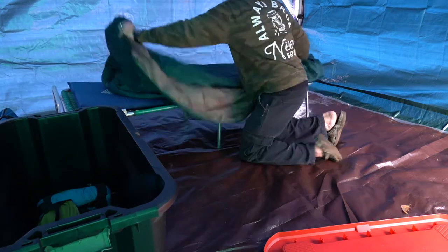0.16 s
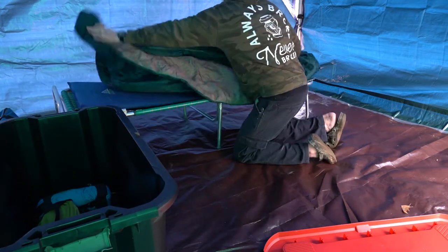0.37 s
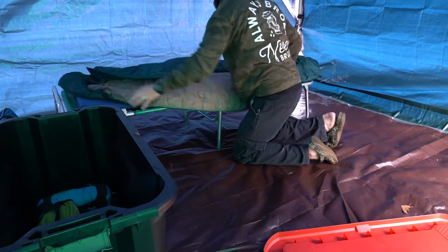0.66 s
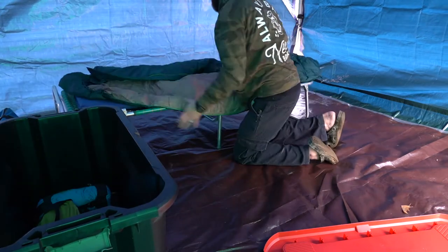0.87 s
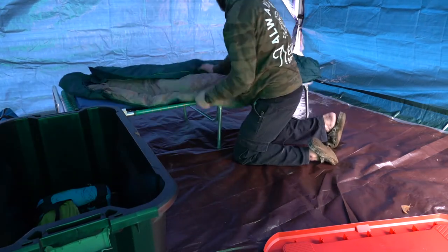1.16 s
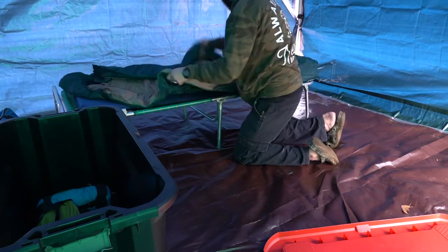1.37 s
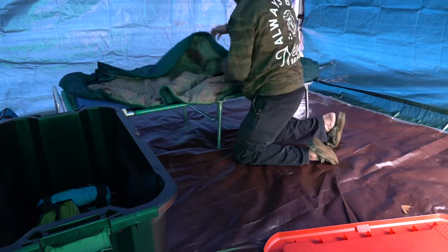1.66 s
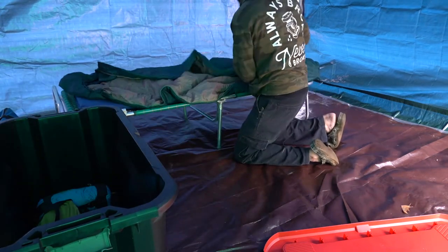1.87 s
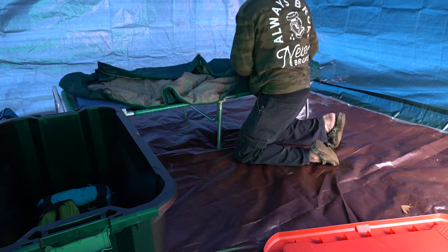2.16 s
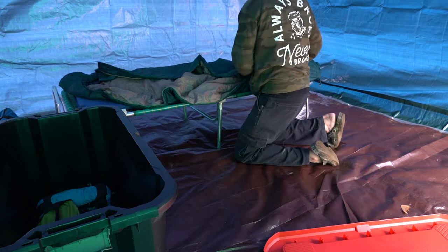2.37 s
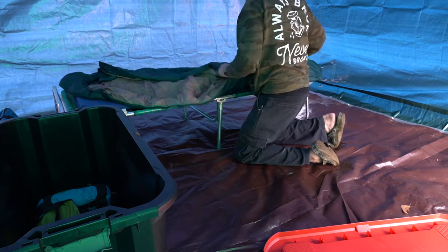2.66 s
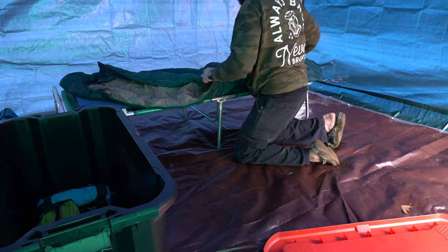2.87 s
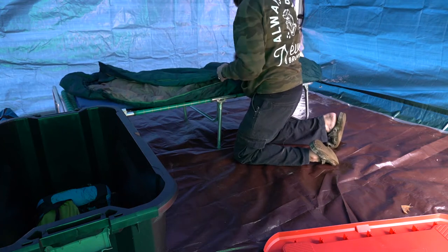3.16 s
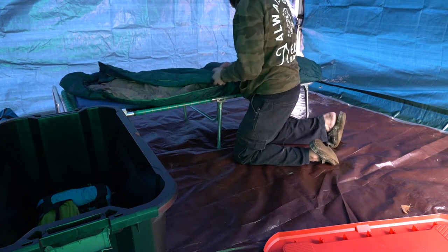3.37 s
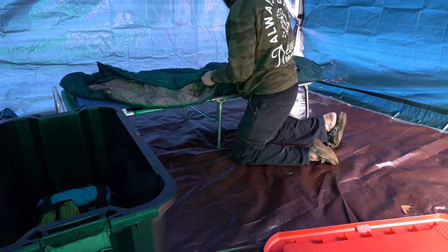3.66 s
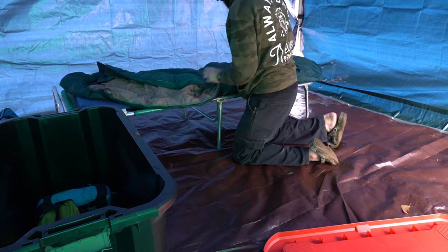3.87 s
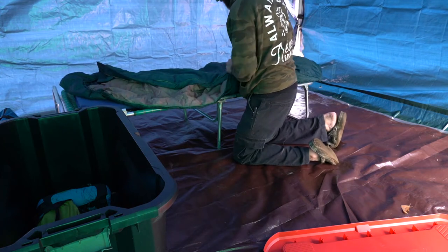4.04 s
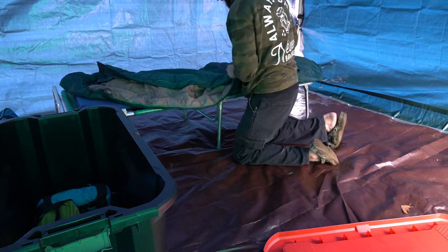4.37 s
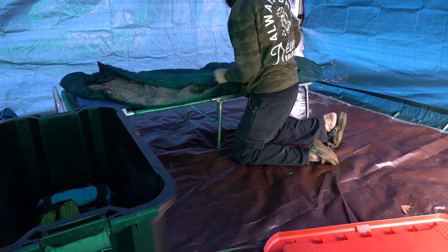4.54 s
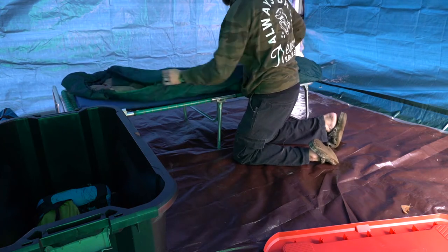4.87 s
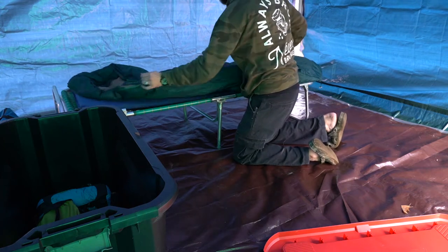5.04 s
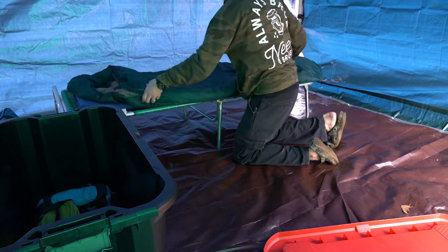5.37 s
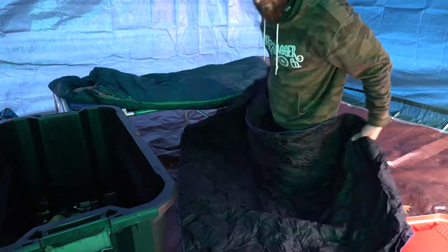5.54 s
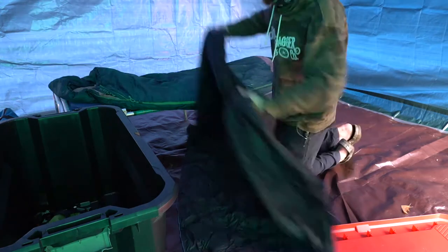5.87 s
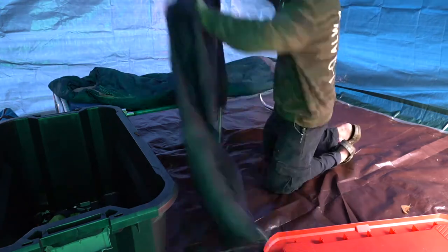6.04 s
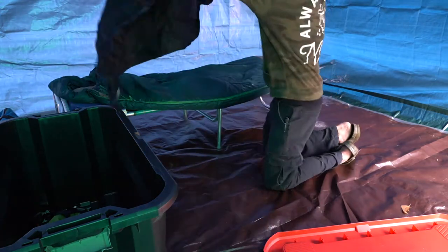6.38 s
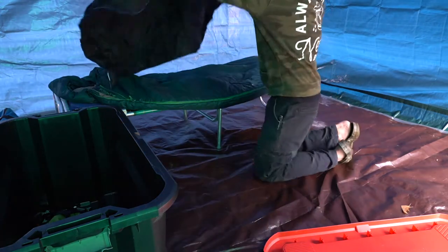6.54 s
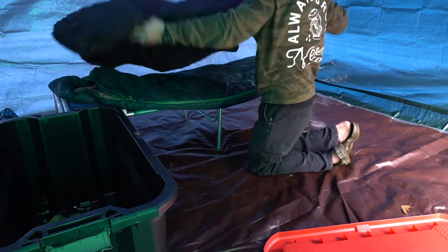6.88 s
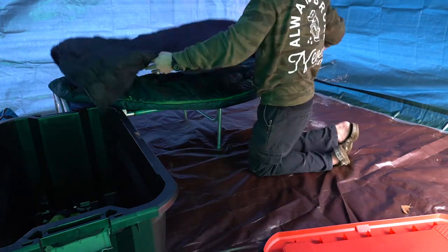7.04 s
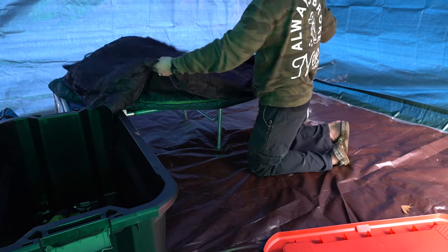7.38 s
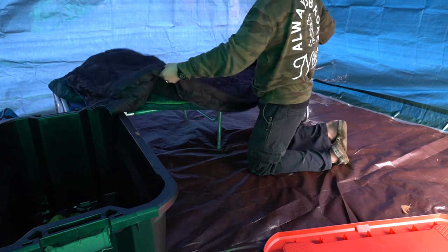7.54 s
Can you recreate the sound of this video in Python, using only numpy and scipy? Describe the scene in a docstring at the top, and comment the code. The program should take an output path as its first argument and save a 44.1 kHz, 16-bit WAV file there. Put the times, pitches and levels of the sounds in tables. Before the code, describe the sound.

A small machine, probably a heater, blows softly throughout inside a tent, its pump ticking dully six or seven times a second until about 5.5 seconds. At the start a nylon sleeping bag is shaken out with crisp flaps, soft thumps and a brief squeaky skid at 0.5 seconds, then rustles as it is gathered. The zipper buzzes, rising in pitch, from 2.4 to 2.8 seconds, and gives a short tug at 3.6. A hand swipes the nylon at 4.3. A second long zipper pull speeds up and slows down between 4.4 and 5.2 seconds. A low puff of air touches the microphone at 5.6 as another bag is swung up. It flaps loudly at 6.1, whips with a thin whistle at 6.3, then settles with softer rustles and pats until about 7.7 seconds. The sound is mono, with very little reverberation.

```python
"""Nylon rustles and flaps as a sleeping bag is shaken out on a cot in a tent; its zipper runs three times.
The teeth sing at the speed of the slider, louder the faster it goes. Then a second bag is swung up,
whips once and settles. Behind it a small machine, probably a heater, blows softly throughout;
its pump ticks for the first five seconds or so. The sound is mono."""
import sys
import numpy as np
from scipy import signal
from scipy.fft import rfft, irfft, next_fast_len
from scipy.io import wavfile
from scipy.ndimage import map_coordinates

SR = 44100
rng = np.random.default_rng(int(sys.argv[2]) if len(sys.argv) > 2 else 0)


def put_to_file(sound):
    """Save the sound as 16-bit audio at rate SR, in the file named by the first command-line argument."""
    columns = np.atleast_2d(sound).T  # one column per channel
    safe = np.clip(columns, -1, 1)
    whole_steps = np.round(safe * 32767)
    wavfile.write(sys.argv[1], SR, whole_steps.astype(np.int16))


N = 340055

# scrape spectrum of teeth or threads: (frequency [Hz], relative density [dB])
SCRAPE_SPECTRUM = [(100, -8), (300, -9), (700, 2), (1250, -5), (2400, -0.5), (3900, -4), (5000, -13.5),
                   (6400, -15.5), (9000, -18), (14400, -18), (15800, -23)]


def amp(db):
    """Decibels to gain."""
    return 10 ** (np.asarray(db) / 20)


def unit(x):
    """Scale to rms 1."""
    return x / np.sqrt(np.mean(x ** 2) + 1e-20)


def along(points, hz):
    """Interpolate (frequency [Hz], value) points on a log axis."""
    knots_hz, values = np.transpose(points)
    return np.interp(np.log(hz + 1), np.log(knots_hz + 1), values)


def span(start_s, end_s):
    """Sample times [s]."""
    return np.arange(round(start_s * SR), round(end_s * SR)) / SR


def swell(t, full_s, rise_s, hold_s, fall_s):
    """Envelope held at 1 from full_s; rise and fall are times per 20 dB."""
    early = np.maximum(full_s - t, 0) / max(rise_s, 1e-4)
    late = np.maximum(t - full_s - hold_s, 0) / max(fall_s, 1e-4)
    return amp(-20 * np.minimum(early + late, 10))


def wobble(knots_per_s, t):
    """Smooth random curve."""
    return map_coordinates(rng.standard_normal(len(t)), [(t - t[0]) * knots_per_s], mode="mirror")


def filtered(x, gain):
    """Zero-phase filter with response gain(hz)."""
    size = next_fast_len(len(x) + 8192)
    return irfft(rfft(x, size) * gain(np.fft.rfftfreq(size, 1 / SR)), size)[:len(x)]


def coloured(x, spectrum):
    """Shape x by a spectrum, rms 1."""
    return unit(filtered(x, lambda hz: amp(along(spectrum, hz))))


def resonate(x, hz, q):
    """One damped resonance."""
    return signal.lfilter(*signal.iirpeak(min(hz, SR / 3), max(q, .7), SR), x)


def add(track, start_s, x):
    """Mix x into the track."""
    part = track[max(round(start_s * SR), 0):][:len(x)]
    part += x[:len(part)]


def heater(first_tick_s=.119, period_s=.15144, pump_stop_s=5.45):
    """A steady blower with a hollow duct note; even pump ticks ring the casing."""
    # blower air: (frequency [Hz], relative density [dB])
    blower_spectrum = [(12, -35), (20, -3), (95, -7.5), (133, -8.5), (203, -10.5), (284, -6), (397, -14.5),
                       (603, -6), (713, -23), (866, -11.5), (1510, -20.5), (3700, -23), (5950, -34),
                       (11000, -36.5), (15800, -40)]
    # casing modes: (frequency [Hz], relative level [dB], t60 [s])
    casing_modes = [(207, -2, 0.096), (303, -1.5, 0.061), (460, -5.5, 0.035)]
    t = np.arange(SR // 5) / SR
    blower = amp(-41.5) * coloured(rng.standard_normal(N), blower_spectrum)
    duct = amp(-45.5) * unit(resonate(rng.standard_normal(N), hz=642, q=8.1))
    out = blower + duct
    onset = 1 - np.exp(-t / 0.0072)
    for start_s in np.arange(first_tick_s, pump_stop_s, period_s):
        ring = sum(amp(db + rng.normal(0, 1.3) - 60 * t / t60_s) * np.sin(2 * np.pi * hz * t)
                   for hz, db, t60_s in casing_modes)
        add(out, start_s, amp(-24.5) * ring * onset)
    return out


def crinkle(t, per_s, share):
    """Smooth rubbing plus tiny creases that buckle at random and carry `share` of the power."""
    creases = unit(rng.uniform(-0.98, 1, len(t)) * (rng.random(len(t)) < per_s / SR))
    return np.sqrt(share) * creases + np.sqrt(1 - share) * rng.standard_normal(len(t))


def cloth():
    """With each movement the padding flaps dully while the nylon shell rubs and creases."""
    # first bag shaken, gathered, gripped, smoothed; second swung up, settling: (full at [s],
    # rise [s/20 dB], hold [s], fall [s/20 dB], relative swish [dB], padding, sheen [dB re swish])
    movements = [ (0.183, 0.21, 0.093, 0.82, -26.5, 0, -10), (0.615, 0.081, 0.022, 0.11, -27.5, -6, -8),
                 (0.715, 0.083, 0.17, 0.36, -38.5, -1, -21), (1.174, 0.035, 0.009, 0.058, -40.5, -6, 0),
                 (1.246, 0.38, 0.19, .2, -36, -1, -10), (1.416, 0.076, .01, 0.13, -31, 4.5, -6.5),
                 (1.598, 0.19, .02, 0.23, -40, -5, -8.5), (1.767, 0.019, 0.034, 0.56, -41, -2, -13),
                 (2.125, 0.13, 0.027, 0.09, -44.5, -8, -10), (2.224, 0.045, 0.077, 0.23, -42, -6, -7),
                 (2.821, 0.15, 0.054, .12, -35, 2.5, -6.5), (3.002, 0.13, 0.06, 0.31, -38.5, 1.5, -9),
                 (3.23, 0.15, 0.18, 0.22, -46, 5.5, -11), (3.512, 0.15, .03, 0.31, -38, 0, -9.5),
                 (3.79, 0.097, 0.037, 0.061, -42, -4, -8.5), (4.018, 0.088, 0.065, 0.12, -47, 1.5, -4),
                 (5.14, 0.13, 0.13, 0.22, -41, 1.5, -10.5), (5.372, 0.19, 0.088, 0.091, -32.5, -6, -10),
                 (5.546, 0.043, 0.073, 0.8, -36.5, -4.5, -9.5), (5.9, 0.31, 0.17, 0.18, -28.5, -0.5, -7),
                 (6.064, 0.19, 0.013, 0.17, -23, 1, -25), (6.19, 0.16, 0.14, 0.09, -40.5, -3, -2.5),
                 (6.612, 0.53, 0.078, 0.33, -34.5, -4.5, -7.5), (6.81, 0.054, 0.012, .2, -36, -0.5, -7),
                 (6.886, .05, 0.11, 0.34, -38, -3, -12), (7.09, 0.12, 0.21, 0.18, -39, 2.5, -12),
                 (7.45, 0.22, .02, 0.24, -36.5, -1, -9), (7.64, 0.16, 0.034, 0.22, -32.5, -2, -11)]
    # dull padding, shell swish, high sheen: (frequency [Hz], relative density [dB])
    padding_spectrum = [(35, -33), (60, -2), (107, -4.5), (342, 0), (406, 0.5), (571, -0.5), (715, 2.5),
                        (930, -0.5), (1090, -2), (1400, -14), (1820, -75), (3080, -120)]
    swish_spectrum = [(650, -13), (1100, -1.5), (1190, -8), (1450, -7), (2520, -2.5), (5500, -16),
                      (7150, -41), (12100, -120)]
    sheen_spectrum = [(2710, -8), (4600, -11), (5540, -11.5), (5800, -7.5), (7360, -6), (12300, -9),
                      (15000, -14.5), (15800, -18)]
    t, power = span(0, N / SR), np.zeros((3, N))
    for full_s, rise_s, hold_s, fall_s, db, padding_db, sheen_db in movements:
        gains = amp([db + padding_db, db, db + sheen_db])
        power += np.outer(gains ** 2, swell(t, full_s, rise_s, hold_s, fall_s) ** 2)
    flap, rub, shine = np.sqrt(power)
    folds = wobble(45, t)
    creases = crinkle(t, per_s=900, share=0.16)
    padding = flap * amp(1.5 * folds) * coloured(crinkle(t, per_s=400, share=.4), padding_spectrum)
    swish = rub * amp(1.2 * folds) * coloured(creases, swish_spectrum)
    sheen = shine * amp(0.87 * folds) * coloured(creases, sheen_spectrum)
    return amp(-1) * (padding + swish + sheen)


def slap(hz, q, extra_t60_s=0.031, extra_db=-14):
    """A slap of cloth with two decays: an extra sharp snap for flicks, a longer fade for thumps."""
    t = np.arange(SR // 4) / SR
    envelope = amp(-23 - 60 * t / 0.058) + amp(extra_db - 60 * t / extra_t60_s)
    push = rng.standard_normal(len(t)) * envelope
    push[SR // 2000] += 3  # impact
    body = resonate(resonate(push, hz, q), hz, q / 2)
    return body / np.abs(body).max()


def flicks_and_thumps():
    """Folds snap straight with a crisp edge; the padding drops on the cot and pushes air."""
    # fold flicks and taps on the cot: (time [s], body peak [dB], centre [Hz])
    flicks = [(0.241, -6, 1370), (0.326, -11, 1040), (0.623, -6.5, 2160), (1.11, -24, 584),
              (1.177, -20, 4770), (1.415, -11, 2070), (1.765, -22.5, 594), (2.29, -28, 6500),
              (3.597, -14, 740), (5.471, -15.5, 850), (5.707, -14, 616), (6.067, -7, 820),
              (6.085, -8, 1200), (6.392, -17, 850), (6.428, -17, 1060), (6.894, -19.5, 990),
              (7.122, -19, 500), (7.517, -19, 760), (7.548, -17.5, 1500)]
    # padding lands or fills with air: (time [s], peak [dB], centre [Hz])
    thumps = [(0.195, -14, 320), (.326, -15, 350), (0.567, -8.5, 237), (1.134, -18.5, 227),
              (1.415, -22.5, 150), (5.114, -20, 220), (6.097, -12, 230), (7.223, -22, 250)]
    out = np.zeros(N)
    for start_s, db, hz in flicks:
        add(out, start_s, amp(db) * slap(hz, q=2.15))
        add(out, start_s, amp(db - 7) * slap(min(hz * 3.7, 3200), q=1.2))  # crisp edge
    for start_s, db, hz in thumps:
        add(out, start_s, amp(db) * slap(hz, q=0.5, extra_t60_s=0.12, extra_db=-25))
    return out


def stroke(speed, spectrum, tone_db, teeth_db, scrape_db, attack_s, release_s, ease_s,
           bite_s=.001, slow_dull=0, jitter=.016, blur_rad=.19):
    """A ribbed track is run over: the tooth rate sets pitch and loudness, and each tooth scrapes."""
    # tape and padding response on harmonics 1 and 2: (frequency [Hz], gain [dB])
    tape_response = [(170, -1), (250, 2), (370, 1.5), (510, 2.5), (590, 5.5), (680, 7.5), (740, 3),
                     (800, 0), (900, 2), (1020, 2.5), (1250, 1), (1500, -4.5), (1750, 2.5), (2000, -9),
                     (2350, 4), (3900, 2.5)]
    # rasp of the higher harmonics: (frequency [Hz], relative gain [dB])
    rasp_response = [(400, -16), (1200, 2.5), (2000, 2), (2600, 2.5), (3500, 1), (4400, -8), (5200, -12),
                     (8000, -27), (15800, -28)]
    cruise_hz, db_per_doubling, treble_db_per_doubling = 905, 4, 4.5
    t, out = span(speed[0][0], speed[-1][0]), np.zeros(N)
    elapsed_s, left_s = t - t[0], t[-1] - t
    rate_hz = np.interp(t, *np.transpose(speed))
    pace = np.minimum(rate_hz / cruise_hz, 1)
    stutter = jitter / pace ** 0.786  # slow strokes run less evenly
    phase = 2 * np.pi * np.cumsum(rate_hz * (1 + stutter * wobble(150, t))) / SR

    def harmonic(k, flutter_db):
        """Teeth catch unevenly, smearing high harmonics most."""
        smear = blur_rad * k ** .78 * (wobble(220, t) + .5 * wobble(700, t))
        return unit(amp(flutter_db * wobble(75.93, t)) * np.sin(k * phase + smear))

    tension = np.minimum(elapsed_s / bite_s, 1) ** 2  # the tape tightens
    press = np.minimum(left_s / ease_s, 1)  # the hand lets up
    root_gain = amp(along(tape_response, rate_hz)) * tension * np.sqrt(press)
    octave_gain = amp(along(tape_response, 2 * rate_hz) - 2) * pace ** slow_dull  # slack tape needs speed
    hum = root_gain * harmonic(1, 3.3) + press * octave_gain * harmonic(2, 3.3)
    teeth = coloured(sum(harmonic(k, 4.5) for k in range(3, 8)), rasp_response)
    teeth *= pace ** 1.1  # a slow slider scrapes, a fast one sings
    scrape = coloured(rng.standard_normal(len(t)) * (1 + 0.21 * np.cos(phase)), spectrum)
    treble = filtered(scrape, lambda hz: np.clip(hz / 3000 - 1.5, 0, 1))
    scrape += treble * (amp(treble_db_per_doubling * np.log2(rate_hz / rate_hz.max())) - 1)
    envelope = np.minimum(elapsed_s / attack_s, 1) * np.minimum(left_s / release_s, 1) ** 2
    grip = unit(amp(0.74 * wobble(131.8, t)))
    drive = envelope * grip * amp(db_per_doubling * np.log2(rate_hz / cruise_hz))
    mix = amp(tone_db) * hum + press * amp(teeth_db) * teeth + amp(scrape_db) * scrape
    add(out, t[0], drive * mix)
    return out


def skids():
    """Nylon sings on nylon: sharply as the first bag is flung, faintly as the second glides down."""
    # sliding speeds: (time [s], thread rate [Hz])
    fling_speed = [(0.468, 800), (0.486, 1880), (0.526, 1970), (0.552, 920), (0.566, 360)]
    glide_speed = [(6.55, 714), (6.65, 760), (6.72, 575)]
    # bright scrape: (frequency [Hz], relative density [dB])
    fling_spectrum = [(300, -24), (700, -9), (1200, -9), (2600, -6), (3300, 1), (4200, -0.5), (4900, -7.5),
                      (8000, -13), (11000, -22.5), (15800, -35)]
    fling = stroke(fling_speed, fling_spectrum, tone_db=-23.5, teeth_db=-29, scrape_db=-23.5,
                   attack_s=0.0059, release_s=0.016, ease_s=0.027, jitter=0.0306, blur_rad=0.27)
    glide = stroke(glide_speed, SCRAPE_SPECTRUM, tone_db=-39, teeth_db=-47, scrape_db=-52,
                   attack_s=0.044, release_s=.03, ease_s=.03, jitter=0.013, blur_rad=0.76)
    return fling + glide


def zipper():
    """The slider runs over the teeth: two long pulls with a short tug between."""
    # slider speeds: (time [s], tooth rate [Hz])
    first_speed = [(2.365, 225), (2.399, 358.1), (2.447, 486.6), (2.483, 730), (2.525, 916.5), (2.655, 909),
                   (2.679, 593), (2.699, 606), (2.733, 874.5), (2.799, 902), (2.83, 845)]
    tug_speed = [(3.593, 750.5), (3.643, 1257), (3.667, 1148), (3.715, 413), (3.735, 222.3)]
    last_speed = [(4.4, 136.9), (4.426, 198.6), (4.476, 310.9), (4.514, 662.9), (4.55, 794.8),
                  (4.602, 871.9), (4.634, 796.6), (4.798, 874.3), (4.818, 935.8), (4.95, 1028),
                  (5.042, 802.9), (5.064, 553.8), (5.17, 154.3)]
    # slider scrape: (frequency [Hz], relative density [dB])
    tug_spectrum = [(100, -9), (700, -1.5), (1400, -8), (2600, 0.5), (3900, -3.5), (5000, -12), (8000, -18),
                    (15800, -20)]
    first = stroke(first_speed, SCRAPE_SPECTRUM, tone_db=-23.5, teeth_db=-25, scrape_db=-25,
                   attack_s=0.013, release_s=0.02, ease_s=0.057, bite_s=0.2, jitter=0.0217)
    tug = stroke(tug_speed, tug_spectrum, tone_db=-24, teeth_db=-23, scrape_db=-25,
                 attack_s=0.021, release_s=.02, ease_s=0.12, slow_dull=1.3)
    last = stroke(last_speed, SCRAPE_SPECTRUM, tone_db=-20.5, teeth_db=-23, scrape_db=-25.5,
                  attack_s=.015, release_s=0.021, ease_s=0.26, slow_dull=1.3)
    return first + tug + last


def swipe(full_s=4.262):
    """A hand drags along the shell: a dull rub under a nylon hiss that peaks slightly later."""
    # rub and hiss: (frequency [Hz], relative density [dB])
    rub_spectrum = [(47, -47), (80, -13), (119, -7), (185, -25.5), (345, -1), (506, -6), (557, -19),
                    (716, -2), (827, -13), (1400, -14), (1820, -43), (3080, -120)]
    hiss_spectrum = [(820, -37), (1400, -10), (1650, -4), (1940, 3), (2280, -0.5), (2790, 2), (4450, 3),
                     (6200, -7), (11000, -19.5), (12400, -13), (15800, -31)]
    t, out = span(-.15, .35), np.zeros(N)
    rub = coloured(crinkle(t, per_s=500, share=0.32), rub_spectrum)
    rub *= swell(t, 0, rise_s=.05, hold_s=.05, fall_s=.17)
    hiss = coloured(crinkle(t, per_s=3000, share=0.34), hiss_spectrum)
    hiss *= swell(t, .018, rise_s=.095, hold_s=.04, fall_s=.18)
    add(out, full_s + t[0], amp(-22) * (rub + hiss))
    return out


def draught():
    """The swung bag fans a low puff of air across the microphone."""
    # air rumble: (frequency [Hz], relative density [dB])
    air_spectrum = [(10, -10), (35, 10), (110, -4), (200, -21), (500, -50), (2000, -100)]
    puff = swell(span(0, N / SR), full_s=5.6, rise_s=.06, hold_s=.005, fall_s=.09)
    return amp(-31) * puff * coloured(rng.standard_normal(N), air_spectrum)


def whip(start_s=6.315, length_s=0.08, whistle_hz=4410):
    """An edge cracks taut and skids with a thin whistle that outlasts the scrape."""
    # skidding edge: (frequency [Hz], relative density [dB])
    edge_spectrum = [(290, -33), (500, -10), (569, -6.5), (771, -20), (891, -7), (986, -20), (2120, -13.5),
                     (2960, -8.5), (4060, -5.5), (4370, -2), (6090, -16), (6640, -14.5), (10700, -23.5),
                     (13300, -18), (15800, -27)]
    t, out = span(0, length_s), np.zeros(N)
    crack = amp(-16) * swell(t, 0, rise_s=0, hold_s=.002, fall_s=.008)
    slide = amp(-17.5) * swell(t, 0, rise_s=0, hold_s=.012, fall_s=.075)
    skid = (crack + slide) * coloured(crinkle(t, per_s=3000, share=0.29), edge_spectrum)
    pitch_hz = whistle_hz * (1 + .012 * wobble(480, t))
    flutter = unit(amp(3.5 * wobble(230, t)))
    whistle = flutter * np.sin(2 * np.pi * np.cumsum(pitch_hz) / SR)
    whistle *= amp(-19) * swell(t, 0, rise_s=0, hold_s=.006, fall_s=.12)
    fade = np.minimum((t[-1] - t) / 0.012, 1)
    add(out, start_s, (skid + whistle) * fade)
    return out


def tent(x):
    """Short, soft reverberation off the tarpaulin walls."""
    # decay: (frequency [Hz], t60 [s])
    decay = [(150, 0.27), (1000, 0.16), (4000, 0.17), (14000, 0.15)]
    hz, t, bands = signal.stft(rng.standard_normal(SR // 4), SR, nperseg=256)
    tail = signal.istft(bands * amp(-60 * t / along(decay, hz)[:, None]), SR, nperseg=256)[1]
    response = np.pad(tail, (SR // 250, 0)) / np.linalg.norm(tail)  # 4 ms pre-delay
    return signal.fftconvolve(x, response)[:N]


def scene():
    """Mono mix on two channels; only the sharp sounds reverberate."""
    sharp = zipper() + skids() + flicks_and_thumps() + whip()
    mono = sharp + amp(-8) * tent(sharp) + swipe() + cloth() + draught() + heater()
    return np.array([mono, mono])


def record(dry):
    """Round off the highest peaks, then limit the band."""
    ceiling, top_hz = .8, 15800
    rounded = dry / (1 + np.abs(dry / ceiling) ** 6) ** (1 / 6)
    return np.array([filtered(channel, lambda hz: hz < top_hz) for channel in rounded])


dry = scene()
out = record(dry)
put_to_file(out)
```